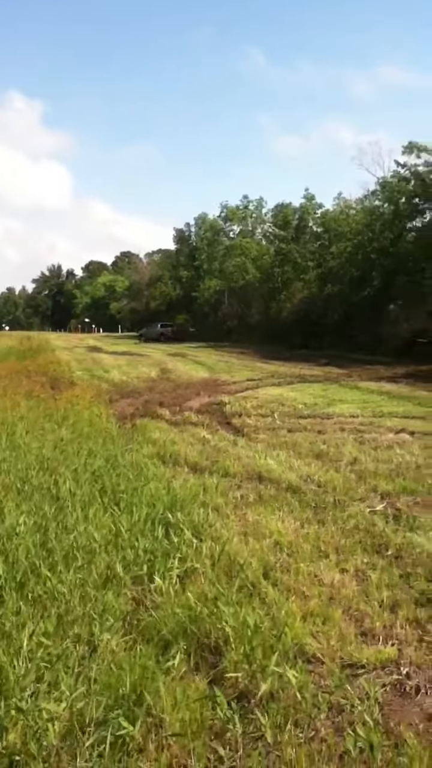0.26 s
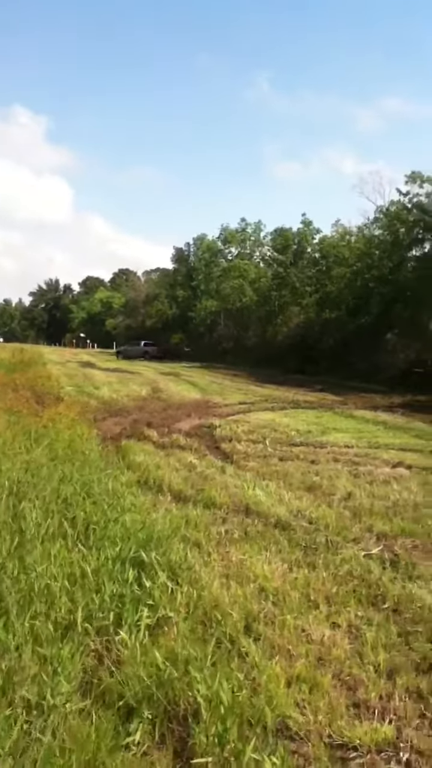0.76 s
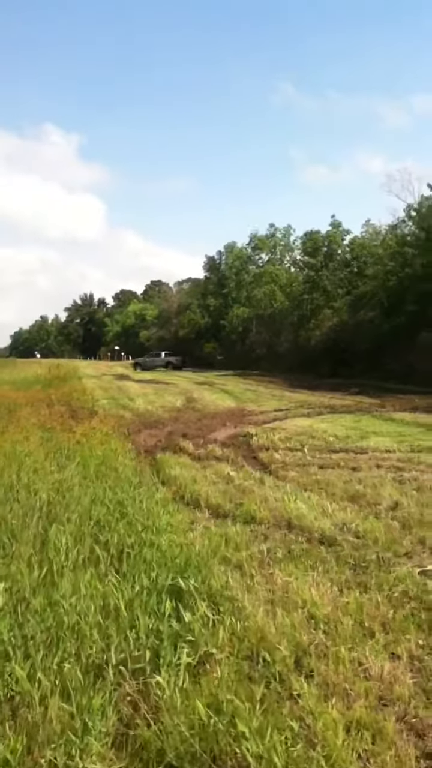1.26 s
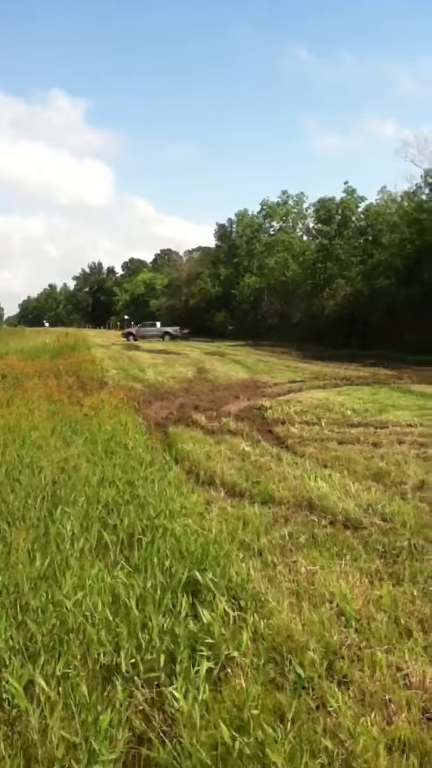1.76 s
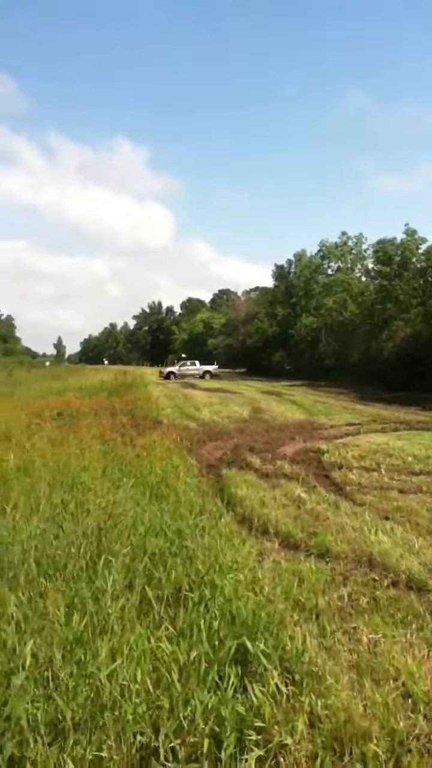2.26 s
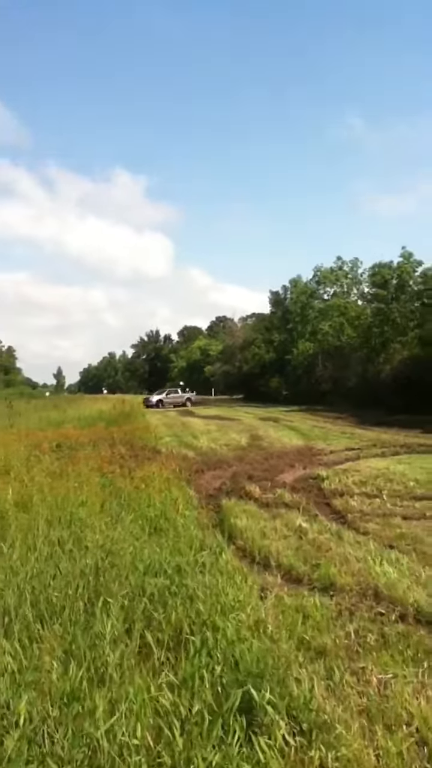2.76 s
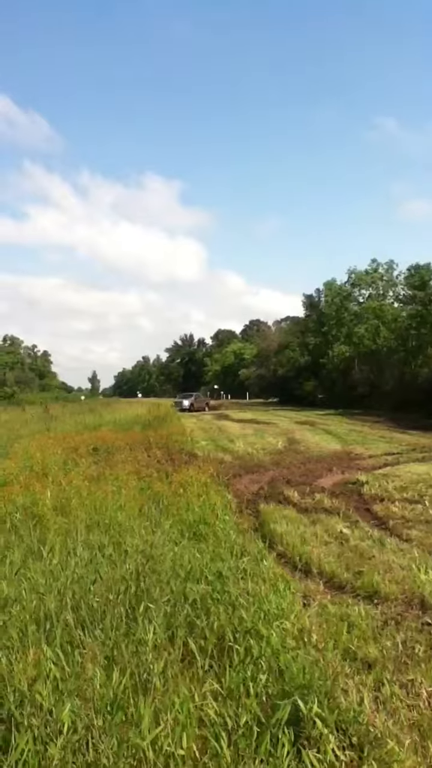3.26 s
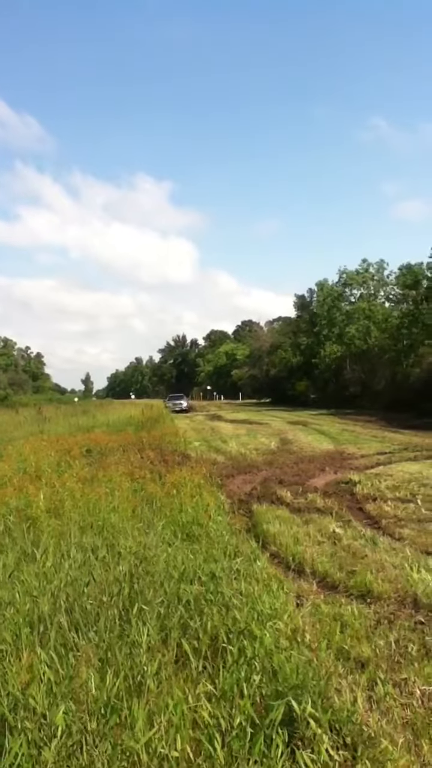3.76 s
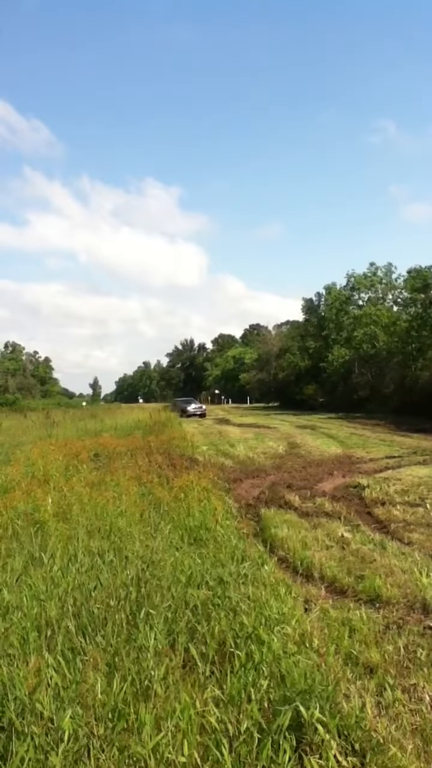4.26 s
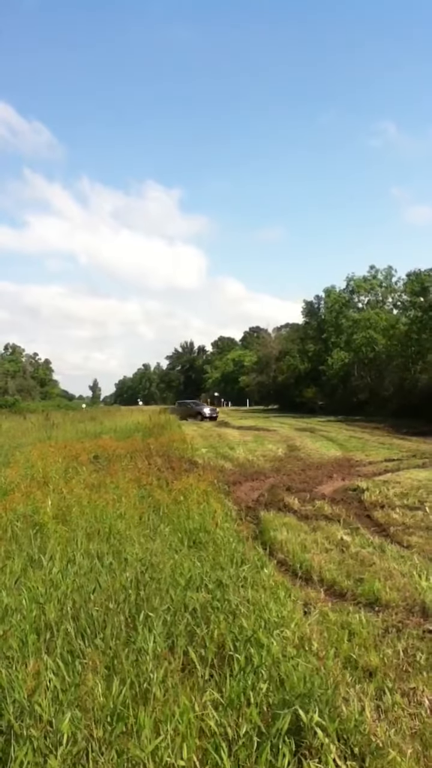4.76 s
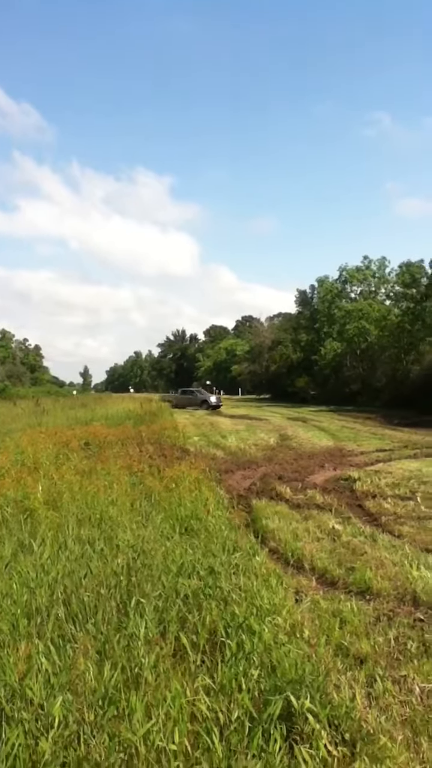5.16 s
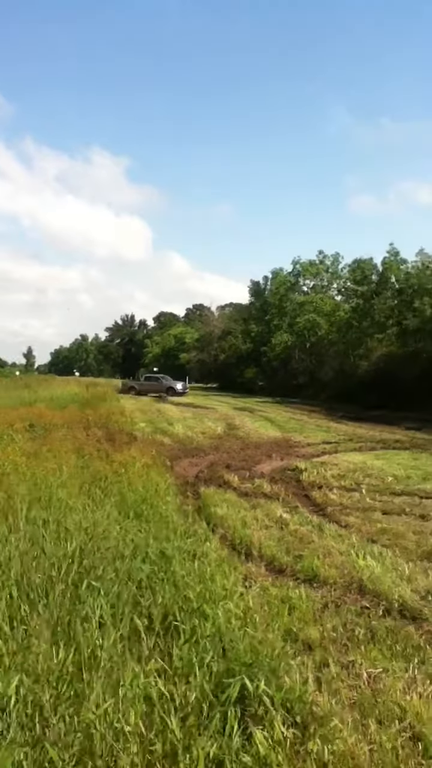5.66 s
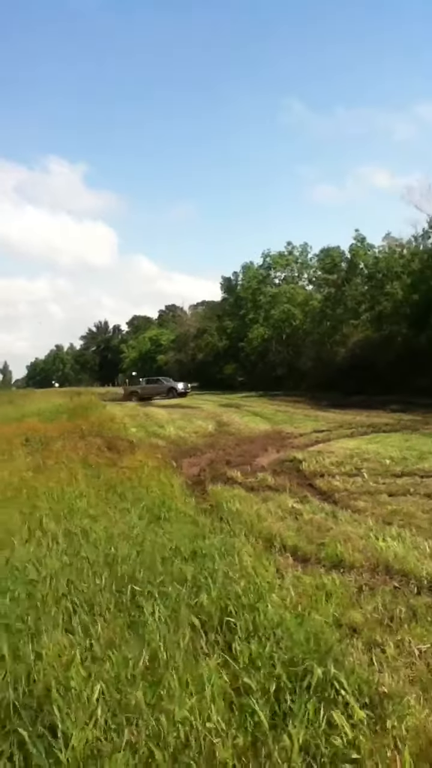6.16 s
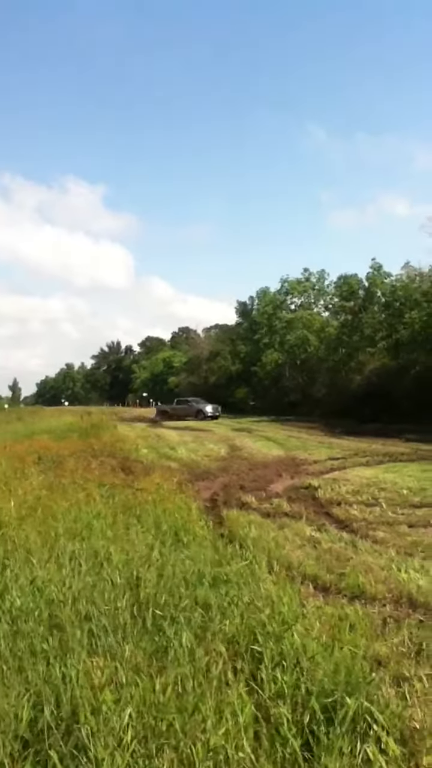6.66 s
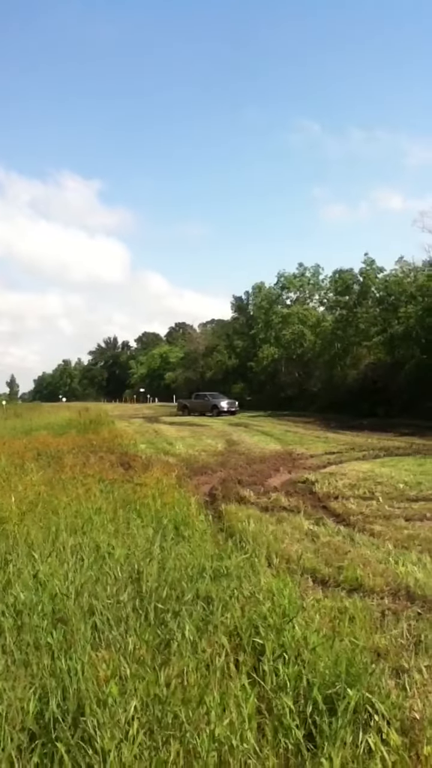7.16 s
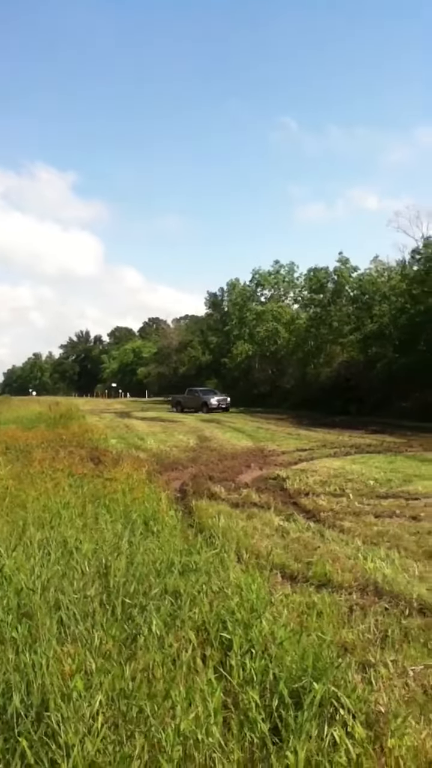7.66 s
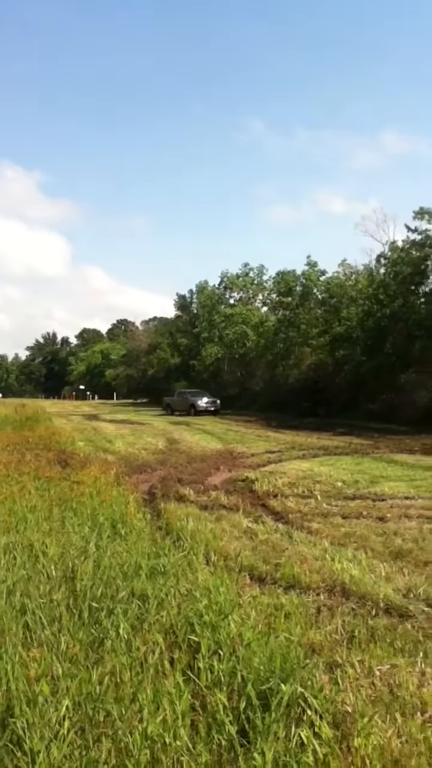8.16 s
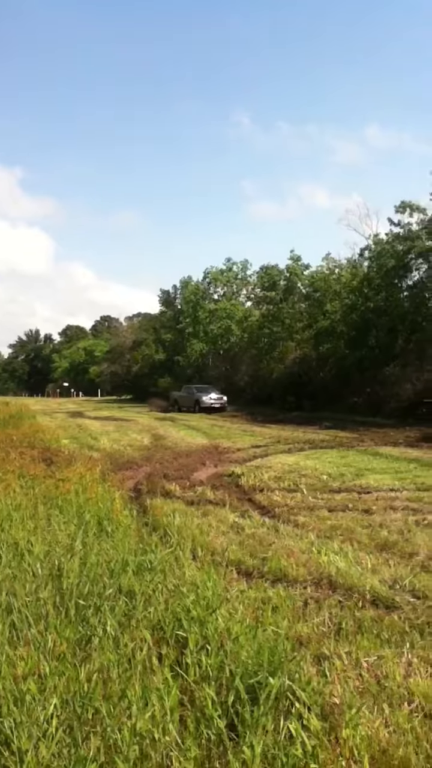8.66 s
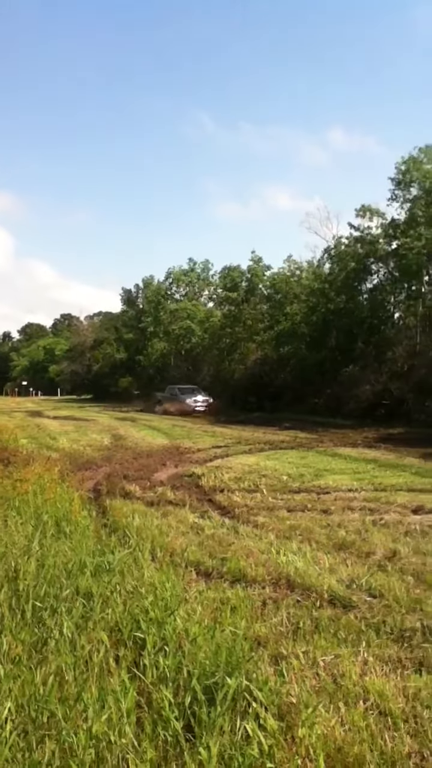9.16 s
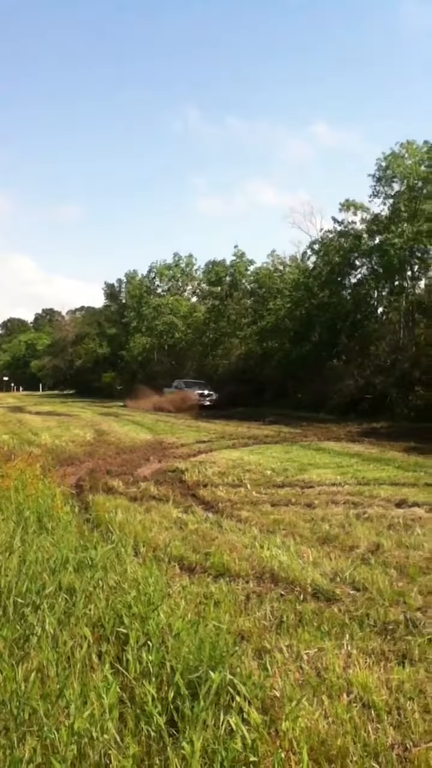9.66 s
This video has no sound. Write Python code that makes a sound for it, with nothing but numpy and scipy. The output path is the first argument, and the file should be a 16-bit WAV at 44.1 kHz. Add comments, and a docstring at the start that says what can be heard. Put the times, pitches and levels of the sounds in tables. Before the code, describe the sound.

Wind thumps the microphone and grass rustles before a far-off truck's loud exhaust roars, drops and climbs three times, tyres hissing through mud.

```python
"""Gusts bump at the microphone and grass rustles while a V8 pickup idles quietly, far across an open field.
Then it revs in three long surges, with a loud exhaust and its wheels spinning in mud.
The exhaust is a set of sine tones on multiples of the engine cycle; the alternator whine is a sine geared to it.
Gas rush is noise and rasp ringing in the pipe, with brief singing tones; mud, wind and grass are shaped noise."""
import sys
import numpy as np
from scipy import signal
from scipy.fft import rfft, irfft, next_fast_len
from scipy.io import wavfile
from scipy.ndimage import uniform_filter1d

SR = 44100
rng = np.random.default_rng(int(sys.argv[2]) if len(sys.argv) > 2 else 0)


def log_audio(samples):
    """Write samples as a 16-bit WAV file to the path given in sys.argv[1]."""
    # one column per channel
    frames = np.atleast_2d(samples).T
    # limit to full scale, then quantise
    limited = np.clip(frames, -1, 1)
    pcm = np.round(limited * 32767).astype(np.int16)
    wavfile.write(sys.argv[1], SR, pcm)


N = 437031
TIME = np.arange(N) / SR  # s

# Engine speed, idle and three surges; eight firings make one engine cycle: (time [s], firing rate [Hz])
ENGINE_SPEED = [(0.0, 75.1), (0.94, 77.6), (1.3, 99.7), (1.44, 122.5), (1.74, 159.2), (2.87, 233.7),
                (3.08, 261.7), (3.54, 277.9), (4.08, 282), (4.44, 189.8), (4.8, 195.7), (5.13, 230),
                (6.1, 321.6), (6.43, 332.4), (6.68, 299.2), (7.35, 136.8), (7.58, 140.9), (7.68, 121.7),
                (7.94, 157.4), (8.29, 166.5), (8.57, 206.1), (9.64, 303.6), (9.91, 255.0)]
CRUISE_HZ = 200  # firing rate at cruising speed
# The throttle opens once and stays open; at idle the exhaust is this much quieter
THROTTLE_S, THROTTLE_RISE_S, IDLE_DB = 0.82, 0.47, -20.5

# Strong exhaust notes: lope of the uneven banks, firing note, its octave; level is at cruising speed
# before muffler, ground and echo: (multiple of cycle rate, level [dB], growth [dB per octave of engine speed])
STRONG_NOTES = [(5, -29, 4.5), (8, -21.5, -0.5), (16, -33.5, -3.5)]
# Weaker exhaust tones, relative to each other: (multiple of cycle rate, level [dB])
BURBLE_TONES = [(2, -65), (3, -38.5), (4, -58), (6, -47), (7, -39.5), (9, -41.5), (10, -48.5), (11, -39.5),
                (12, -65), (13, -43), (14, -57.5), (15, -48), (17, -45), (18, -63), (19, -74)]
# What the muffler lets through: (frequency [Hz], gain [dB])
MUFFLER_GAIN = [(35, -25), (60, -17), (73, -7.5), (92, -4.5), (135, -0.5), (200, 0), (280, -4), (315, -3),
                (350, -15), (450, -16), (540, -39), (800, -34)]
# The tree-line echo weakens or strengthens single notes as the truck moves:
# (time [s], length [s], multiple of cycle rate, gain at the middle [dB])
ECHO_FADES = [(1.62, 0.5, 16, -16), (1.711, 0.058, 8, -22), (2.3, .2, 8, -14.5), (2.6, 0.074, 8, 4),
              (2.74, 0.19, 16, 17.5), (2.867, 0.24, 8, -9), (3.273, 0.073, 8, 5), (3.748, 0.8, 5, -3.5),
              (4.173, 0.13, 8, -12), (4.581, .2, 5, -3.5), (4.88, .19, 8, -15), (5.125, 0.061, 8, 3.5),
              (5.22, 0.18, 5, -8), (6.584, 0.2606, 8, -7.5), (6.61, 0.11, 5, 4), (6.885, 0.11, 8, -27),
              (7.317, 0.083, 8, -10), (8.2, 0.48, 5, -3.5), (8.836, 0.31, 8, -7), (9.471, 0.26, 8, -23),
              (9.61, 0.13, 8, -18)]
# The truck turns its tailpipe and wheels to and from the listener:
# (time [s], gas rush [dB], mud spray [dB], brightness of the rush [dB per octave])
TRUCK_TURN = [(0.0, 17, -2, -12.5), (1.6, -8.5, -5, -2), (2.5, -6.5, -3, -8), (2.76, -2.5, -8, -7),
              (3.02, 3, -0.5, -2), (3.3, 1, 0, 0), (4.0, -2, -4.5, -1), (4.75, 0.5, -3, -3),
              (5.35, 8.5, 1, -3.5), (6.04, 11, 10.5, 3.5), (6.3, 5.5, 4.5, 3), (6.75, 3, 3, 1.5),
              (7.65, -0.5, -1.5, 3), (8.25, 2, -1.5, 0), (8.6, 5, 3, 0.5), (9.05, 2, 4.5, .5),
              (9.91, 2, 2, -2.5)]

# Ringing of the pipe, relative to each other: (frequency [Hz], nominal width [Hz], level per Hz [dB])
PIPE_RINGS = [(735, 173, -6), (1082, 73, 2.5), (1219, 184, -4), (1702, 203, 2), (2245, 172, 0.5),
              (2577, 260, -4), (2823, 187, -4), (3677, 177, -4.5), (4220, 290, -9), (5970, 66, -10)]
# The pipe sings briefly on one resonance: (time [s], length [s], frequency [Hz], level [dB])
PIPE_SONGS = [(2.501, 0.053, 1054, -40), (3.02, 0.065, 1684, -38), (3.324, 0.086, 1112, -33.5),
              (4.729, 0.18, 590, -43.5), (5.0, .12, 1070, -38.5), (5.586, 0.28, 1215, -29.5),
              (5.72, 0.036, 2240, -28), (5.94, 0.2, 1755, -25.5), (6.073, 0.091, 2260, -28)]
# Levels at cruising speed, before the truck turns, and their growth with engine speed
GAS_DB, GAS_DB_PER_OCTAVE = -38, 7.5
MUD_DB, MUD_DB_PER_OCTAVE = -40.5, 7.5

# Colour of the flung mud: (frequency [Hz], relative level [dB])
MUD_COLOUR = [(300, -11), (700, 3), (1400, 2), (2600, -1.5), (3250, -0.5), (4200, -1.5), (5100, -3),
              (6000, 0.5), (7000, 1), (8200, -6), (10000, -11.5), (12000, -20), (14000, -50), (16000, -68)]
# Fine droplets grow louder until the truck has come close
MIST_DB, MIST_CLOSE_S, MIST_DB_PER_S = -53, 9.33, 17

# Alternator whine near the top of a surge: (time [s], length [s], level [dB])
WHINE_SWELLS = [(3.77, .35, -45), (9.25, .45, -44.5), (9.22, .12, -43.5), (9.81, .08, -41.5)]
WHINE_ORDER = 72.2  # multiple of the cycle rate

# Gusts on the microphone, before their noise and thud are balanced: (time [s], length [s], level [dB])
GUST_BUMPS = [(0.15, 0.015, -35), (0.208, 0.017, -34), (0.24, 0.035, -49), (0.303, 0.0077, -27.5),
              (0.344, 0.023, -25.5), (0.424, 0.019, -29), (0.455, .008, -25.5), (.559, 0.0097, -24),
              (0.593, 0.027, -39), (3.226, 0.014, -24), (3.288, 0.011, -33), (3.936, 0.034, -27),
              (3.992, 0.028, -32)]
# A light breeze at first, before the same noise balance: (time [s], length [s], level [dB])
LIGHT_BREEZE = [(.25, .3, -39)]
# Colour of the gusts: (frequency [Hz], relative level [dB])
GUST_COLOUR = [(25, -27), (60, 0), (120, 13), (200, 3.5), (350, -9.5), (480, -12.5), (900, -38),
               (3000, -70)]
# Slow eddies at the microphone: (time [s], length [s], level [dB])
SLOW_EDDIES = [(2.2, .06, -43), (2.48, 0.056, -40), (2.72, 0.04, -41), (3.28, 0.051, -44),
               (3.95, 0.041, -42), (4.55, 0.057, -41), (6.08, 0.11, -49)]
# Grass brushed nearby: (time [s], length [s], level [dB])
GRASS_RUSTLES = [(.25, .06, -53.5), (.44, 0.085, -48), (.57, 0.043, -54), (1.175, 0.018, -42),
                 (1.225, 0.03, -47), (1.83, 0.09, -48.5), (1.96, 0.017, -49), (2.13, 0.019, -54)]
# Colour of the grass: (frequency [Hz], relative level [dB])
GRASS_COLOUR = [(500, -25), (2000, -1), (3500, 0), (7000, 1.5), (10000, -4), (15000, -14)]
# Colour of the open air: (frequency [Hz], relative level [dB])
AIR_COLOUR = [(25, -4), (60, -2), (130, 13.5), (250, 4.5), (450, -2.5), (800, 1), (1200, -2), (1700, -9.5),
              (2400, -16.5), (5000, -17.5), (9000, -21), (15500, -27)]
AIR_DB = -43
TOP_HZ = 15400  # the finished sound stops here


def exhaust(cycle_hz, angle, speed):
    """Strong notes and burble slide through the muffler's passband; uneven combustion roughens them."""
    notes = strong_notes(cycle_hz, angle, speed)
    roughness = undb(-40.5) * noise(lambda hz: response(MUFFLER_GAIN, hz) / (1 + (hz / 700) ** 4))
    low_sounds = burble(cycle_hz, angle) + roughness
    throttle = np.clip((TIME - THROTTLE_S) / THROTTLE_RISE_S, 0, 1)
    # low sounds spread widely, so they follow only a share of the tailpipe's turn
    turn_db = curve(TRUCK_TURN)
    mix = undb(0.11 * turn_db) * notes + undb(1.5 + 0.35 * turn_db) * low_sounds
    return undb(IDLE_DB * (1 - throttle)) * mix


def strong_notes(cycle_hz, angle, speed, ground_hz=365):
    """Sine tones at the lope, the firing note and its octave, with a slightly fluttering phase."""
    shaken = angle + 0.11 / 8 * walk(70)
    notes = 0
    for order, db, db_per_octave in STRONG_NOTES:
        note_hz = order * cycle_hz
        # soft ground swallows a note that climbs too high
        ground = 1 / np.sqrt(1 + (note_hz / ground_hz) ** 14)
        heard = response(MUFFLER_GAIN, note_hz) * ground * echo_gain(order)
        level = np.sqrt(2) * undb(db + db_per_octave * speed)
        notes = notes + level * heard * np.sin(order * shaken)
    return notes


def echo_gain(order):
    """Gain of one note as the echo beats against it: narrow nulls and rounded swells."""
    power = 1
    for time, length, note, db in ECHO_FADES:
        if note == order:
            power = power * (1 + (undb(db) ** 2 - 1) * bell(time, length))
    return np.sqrt(power)


def burble(cycle_hz, angle, scatter=0.48, scatter_rate=5, jitter=0.013, ground_hz=375):
    """The weaker multiples of the engine cycle, heard through the muffler."""
    stride = 16  # these low tones need only every 16th sample
    cycle_hz, angle = cycle_hz[::stride], angle[::stride]
    out, size = 0, len(angle)
    for order, db in BURBLE_TONES:
        # uneven firing smears the high tones most
        phase = order * angle + rng.uniform(0, 2 * np.pi) + jitter * order * walk(40, size)
        # echoes from the tree line add a shifting share, more to the higher tones
        echo = scatter * min(order / 7, 1.3)
        tone = np.sin(phase) * (1 + echo * walk(scatter_rate, size))
        tone = tone + np.cos(phase) * echo * walk(scatter_rate, size)
        # the wave grazing the soft ground cancels the direct one higher up
        ground = 1 / np.sqrt(1 + (order * cycle_hz / ground_hz) ** 12)
        out = out + undb(db) * response(MUFFLER_GAIN, order * cycle_hz) * ground * tone
    return np.sqrt(2) * signal.resample_poly(out, stride, 1, window=("kaiser", 9))[:N]


def gas(angle, speed, flicker_db=1.87, puff=0.09):
    """Turbulent gas and rasp ring the pipe; the flow throbs with the lope."""
    flow = rng.standard_normal(N) + 0.65 * rasp(angle)
    out, tilt = 0, curve(TRUCK_TURN, axis=3)
    for centre, width, db in PIPE_RINGS:
        # each resonance is applied twice for steep flanks
        b, a = signal.iirpeak(centre, centre / (2 * width), fs=SR)
        ring = signal.lfilter(b, a, signal.lfilter(b, a, flow))
        # it arrives by its own path, up to 20 ms late, and flickers
        ring = np.roll(ring, rng.integers(SR // 50))
        level_db = db + tilt * np.log2(centre / 1600) + flicker_db * walk(22)
        out = out + unit(ring) * np.sqrt(width) * undb(level_db)
    opened = np.clip(TIME - 0.8, 0, 1)  # the rush fades in over one second
    level = undb(GAS_DB + GAS_DB_PER_OCTAVE * speed + curve(TRUCK_TURN))
    return unit(out) * level * opened * (1 + puff * np.sin(5 * angle))


def rasp(angle, count=3):
    """Crackle of even strength that repeats with each engine cycle and slowly changes its pattern."""
    patterns = rng.standard_normal((count, 600))
    place = angle / (2 * np.pi) % 1 * patterns.shape[1]
    shares = np.array([walk(6) for _ in patterns])
    shares = shares / np.linalg.norm(shares, axis=0)
    crackle = 0
    for share, pattern in zip(shares, patterns):
        crackle = crackle + share * np.interp(place, np.arange(len(pattern)), pattern)
    return unit(crackle)


def singing(wander=1.13, waver_db=3):
    """Short, hoarse swells of single pipe resonances: sines with a shaky phase and level."""
    phase = wander * walk(110)
    waver = unit(undb(waver_db * walk(80)))
    tones = 0
    for time, length, hz, db in PIPE_SONGS:
        tones = tones + undb(db) * bell(time, length) * np.sin(2 * np.pi * hz * TIME + phase)
    return waver * tones


def mud(speed, patter_db=1.0, surge_db=0.8, split_hz=4800):
    """Spinning tyres fling dull clods and bright spray; each patters on its own."""
    clods = noise(lambda hz: response(MUD_COLOUR, hz) / np.sqrt(1 + (hz / split_hz) ** 8))
    spray = noise(lambda hz: response(MUD_COLOUR, hz) / np.sqrt(1 + (split_hz / (hz + 1)) ** 8))
    flung = undb(1.5 + patter_db * walk(250)) * clods + undb(patter_db * walk(400)) * spray
    level_db = MUD_DB + MUD_DB_PER_OCTAVE * speed + curve(TRUCK_TURN, axis=2)
    return unit(flung) * undb(level_db + surge_db * walk(25))


def mist(patter_db=1.0, centre_hz=12000):
    """Fine droplets off the tyres: pattering treble noise that grows as the truck comes close."""
    level_db = MIST_DB - MIST_DB_PER_S * np.maximum(MIST_CLOSE_S - TIME, 0)
    droplets = noise(lambda hz: 1 / (1 + ((hz - centre_hz) / 3000) ** 2))
    return droplets * undb(level_db + patter_db * walk(400))


def alternator(angle, waver_db=2, slip=0.55):
    """A thin, unsteady whine geared to the crank by a slightly slipping belt."""
    waver = unit(undb(waver_db * walk(35)))
    return np.sqrt(2) * swells(WHINE_SWELLS) * waver * np.sin(WHINE_ORDER * angle + slip * walk(45))


def wind(gust_db=-3, thud_db=3, thud_s=0.001, buffet_db=4):
    """Gusts and a breeze push on the microphone as low noise; each gust also lands with a thud."""
    breeze = swells(LIGHT_BREEZE) * undb(buffet_db * walk(29.7))
    gusts = coloured(GUST_COLOUR) * (swells(GUST_BUMPS) + breeze) * undb(gust_db)
    for time, _, db in GUST_BUMPS:
        # one quick dip in pressure with a small rise on each side
        u = ((TIME - time) / thud_s) ** 2
        gusts = gusts - undb(db + thud_db) * (1 - u) * np.exp(-np.minimum(u, 100) / 2)
    return gusts


def eddies():
    """Slower eddies of air leave a soft rumble around 75 Hz."""
    return noise(lambda hz: 1 / (1 + ((hz - 75) / 30) ** 4)) * swells(SLOW_EDDIES)


def grass(crackle_db=3):
    """Brushed blades crackle: noise with a fast, jumpy level in short swells."""
    return unit(coloured(GRASS_COLOUR) * undb(crackle_db * walk(350))) * swells(GRASS_RUSTLES)


def open_air():
    """The steady hush of the field, as noise whose level wanders slightly."""
    return coloured(AIR_COLOUR) * undb(AIR_DB + walk(6.5) / 2)


def undb(db):
    """Decibels to gain."""
    return np.exp(np.asarray(db) * (np.log(10) / 20))


def unit(x):
    """Scale to an rms (average strength) of 1."""
    return x / np.sqrt(np.mean(x ** 2))


def curve(rows, axis=1):
    """One column of a time table, at every sample."""
    rows = np.array(rows)
    return np.interp(TIME, rows[:, 0], rows[:, axis])


def bell(time, length):
    """A bell-shaped bump of height 1."""
    return np.exp(-((TIME - time) / length) ** 2)


def swells(rows):
    """Envelope of short bell-shaped swells."""
    return sum(undb(db) * bell(time, length) for time, length, db in rows)


def response(points, hz):
    """Gain of a (frequency [Hz], level [dB]) table at the given frequencies."""
    f, db = np.transpose(points)
    return undb(np.interp(np.log(np.maximum(hz, 1)), np.log(f), db))


def filtered(x, gain):
    """A sound passed through the spectrum gain(Hz), at rms 1."""
    size = next_fast_len(N, real=True)
    hz = np.arange(size // 2 + 1) * SR / size
    return unit(irfft(rfft(x, size) * gain(hz), size)[:N])


def noise(gain):
    """Noise of rms 1 whose spectrum is gain(Hz)."""
    return filtered(rng.standard_normal(N), gain)


def coloured(points):
    """Noise of rms 1 with the spectrum of a table."""
    return noise(lambda hz: response(points, hz))


def walk(rate, size=N):
    """Smooth random wandering of rms 1, about `rate` turns a second, in `size` steps over the whole scene."""
    turns = rate * N / SR
    steps = rng.standard_normal(8192)
    path = np.interp(np.linspace(0, turns, size), np.arange(len(steps)), steps)
    return unit(uniform_filter1d(path, int(size / turns / 2) + 1))


def scene():
    """Truck and meadow, the same in both channels; the engine's turning drives exhaust, gas, mud and whine."""
    firing_hz = uniform_filter1d(curve(ENGINE_SPEED), SR // 10)
    cycle_hz = firing_hz / 8
    speed = np.log2(firing_hz / CRUISE_HZ)  # octaves above cruising speed
    angle = 2 * np.pi * np.cumsum(cycle_hz) / SR  # one full turn per engine cycle
    truck = exhaust(cycle_hz, angle, speed) + gas(angle, speed) + singing()
    truck = truck + mud(speed) + mist() + alternator(angle)
    meadow = wind() + eddies() + grass() + open_air()
    mono = truck + meadow
    return np.array([mono, mono])


def record(dry):
    """A steep low-pass filter cuts the treble above TOP_HZ."""
    return signal.sosfilt(signal.ellip(10, 0.1, 80, TOP_HZ, fs=SR, output="sos"), dry)


dry = scene()
out = record(dry)
log_audio(out)
```